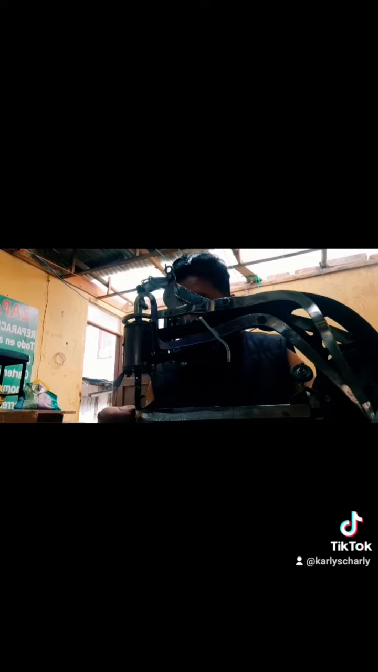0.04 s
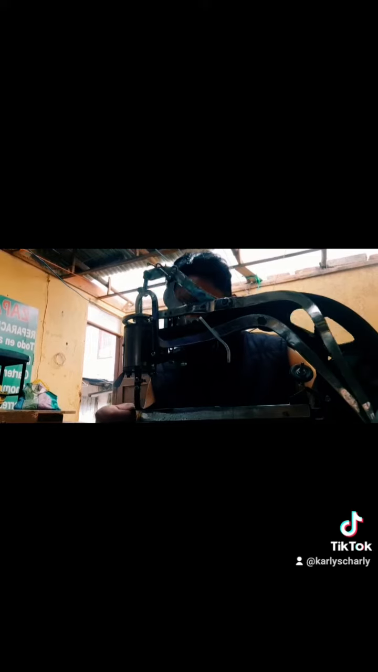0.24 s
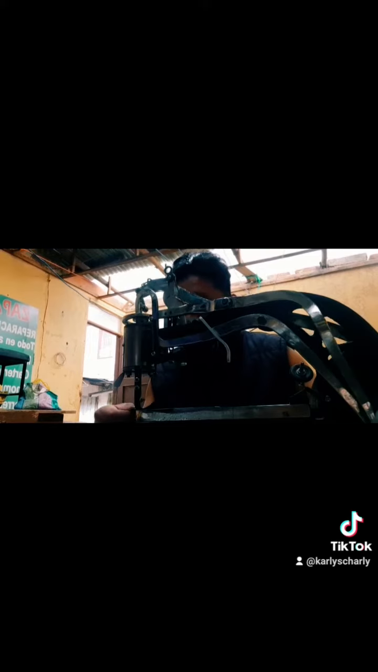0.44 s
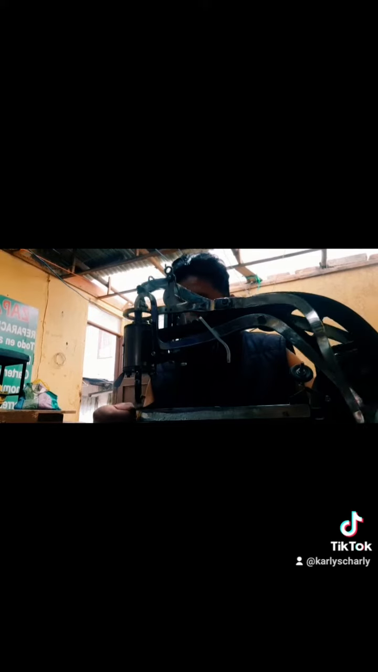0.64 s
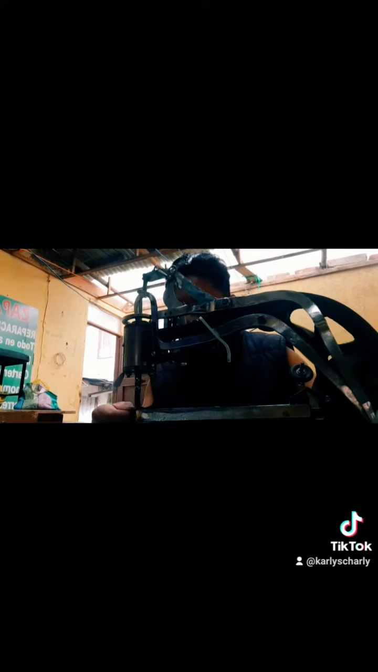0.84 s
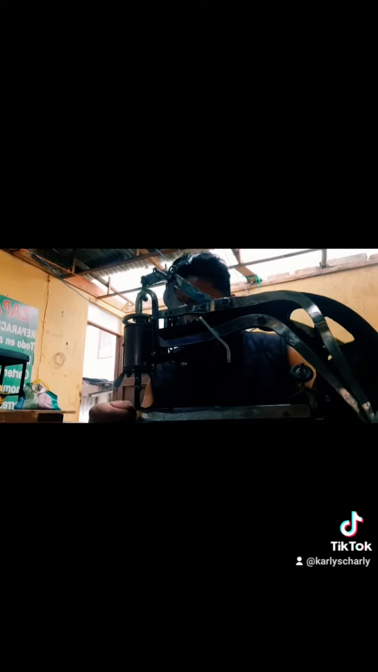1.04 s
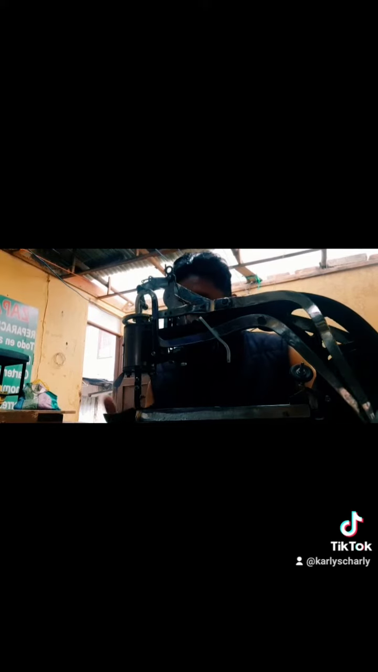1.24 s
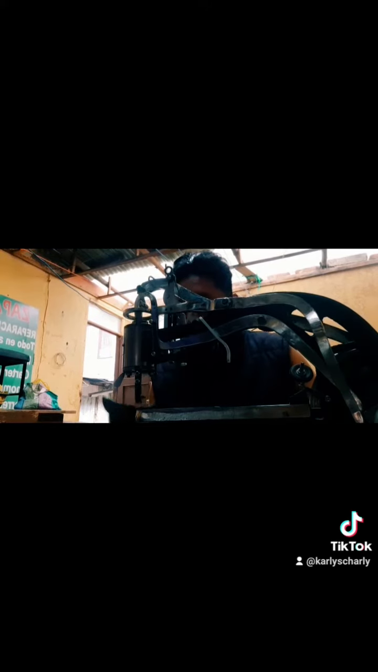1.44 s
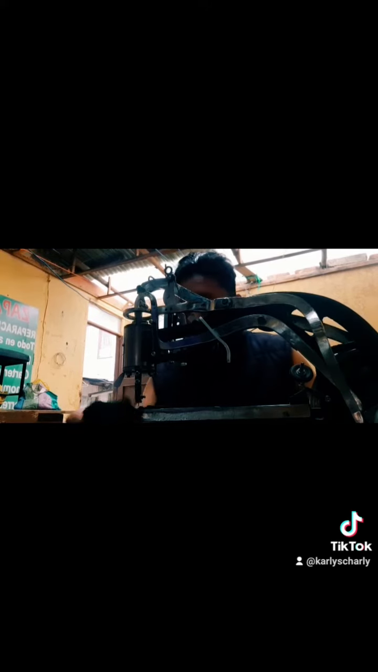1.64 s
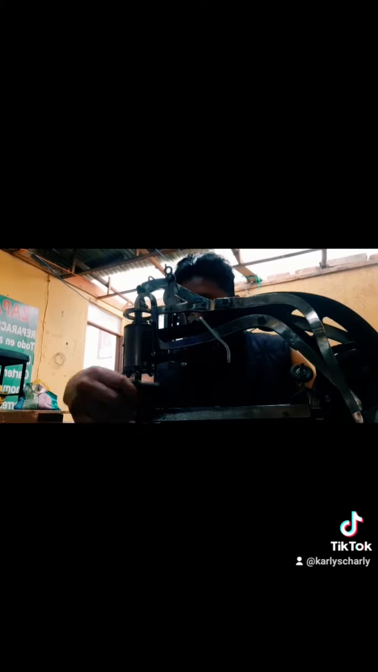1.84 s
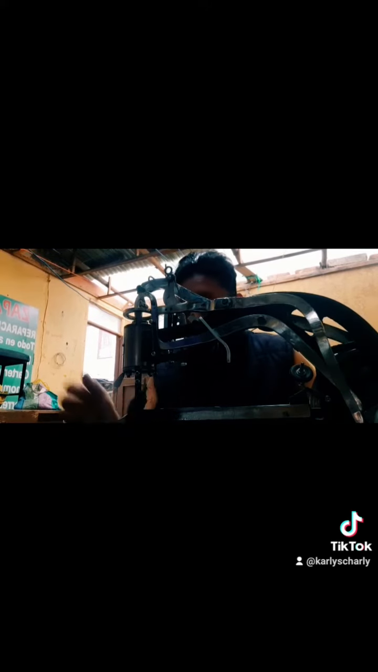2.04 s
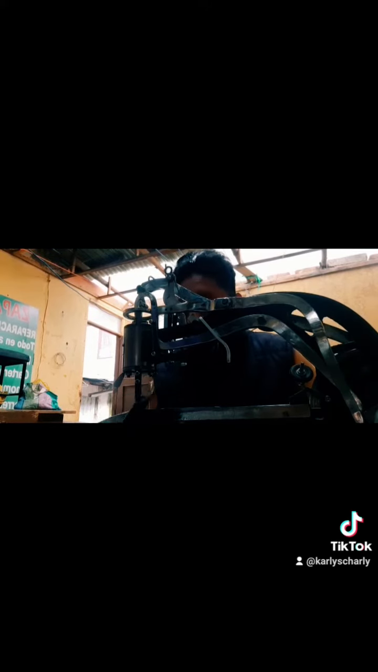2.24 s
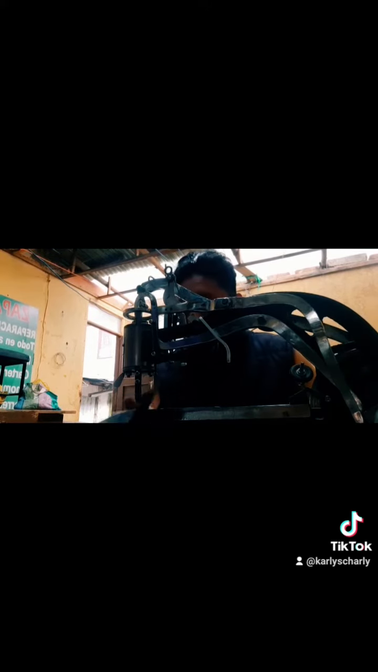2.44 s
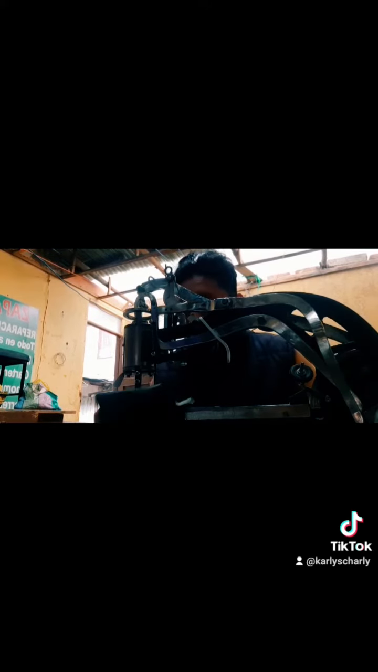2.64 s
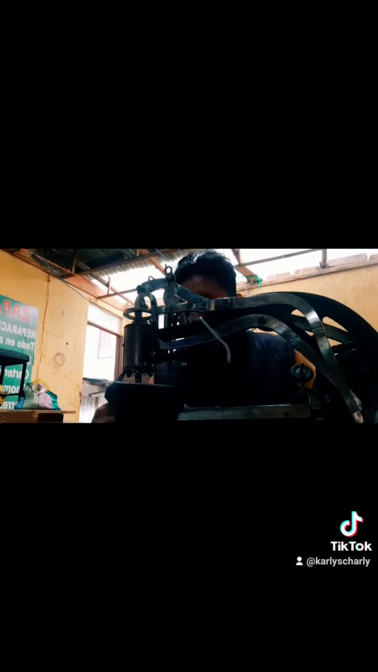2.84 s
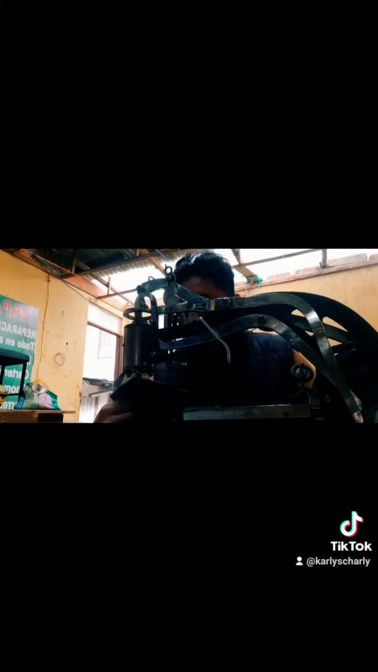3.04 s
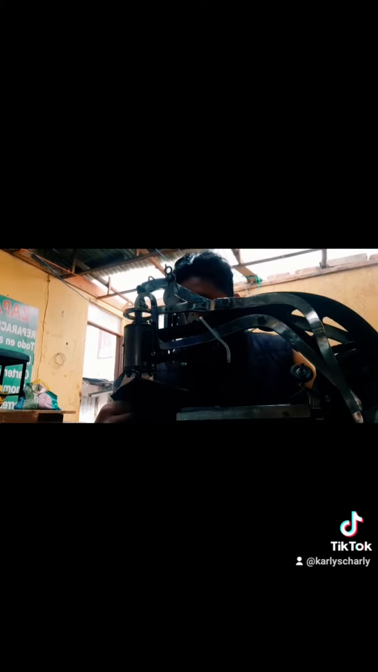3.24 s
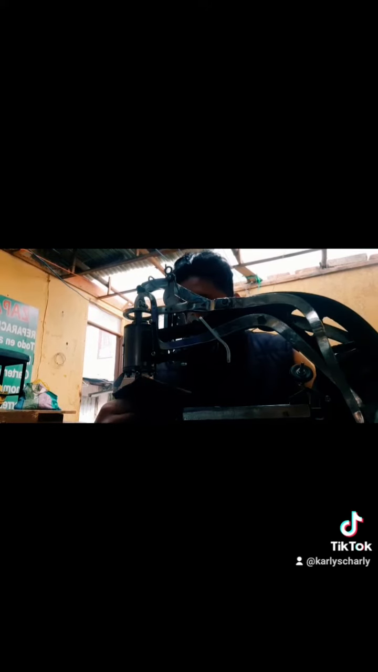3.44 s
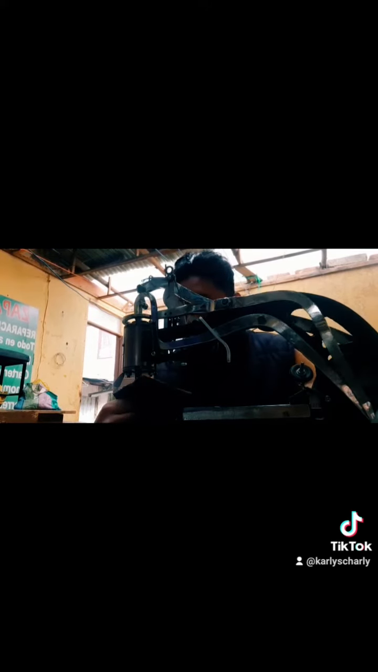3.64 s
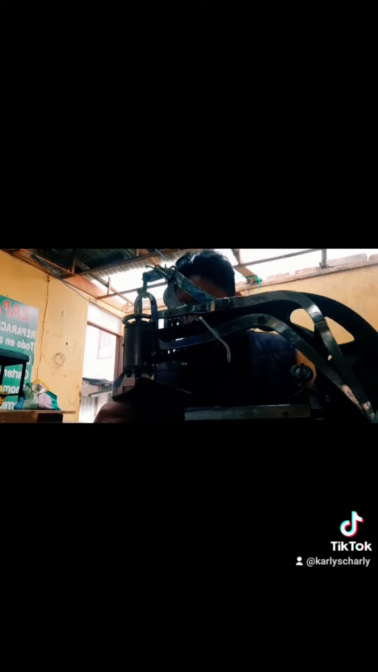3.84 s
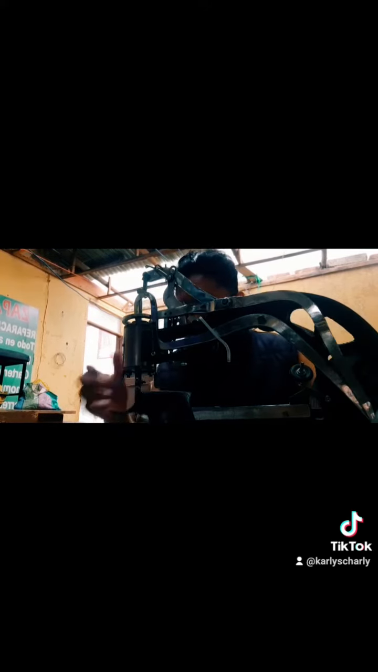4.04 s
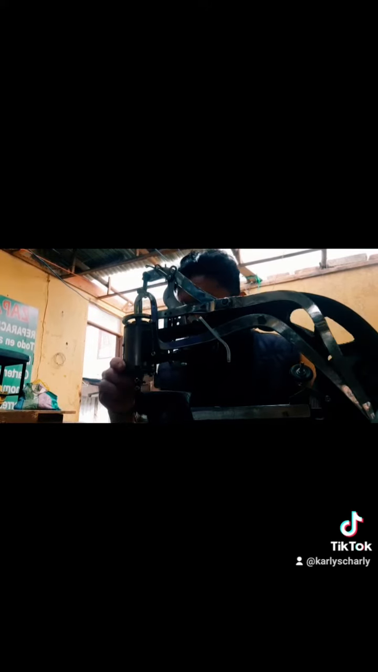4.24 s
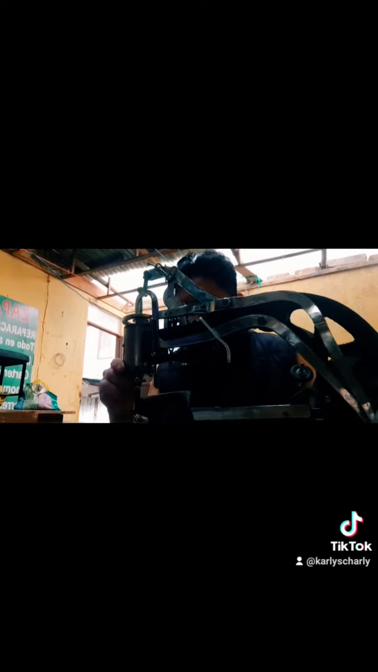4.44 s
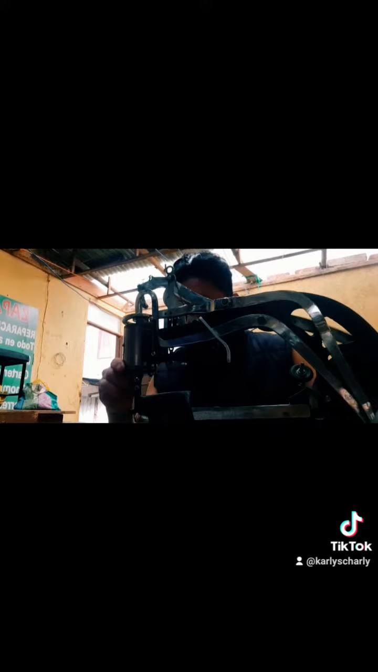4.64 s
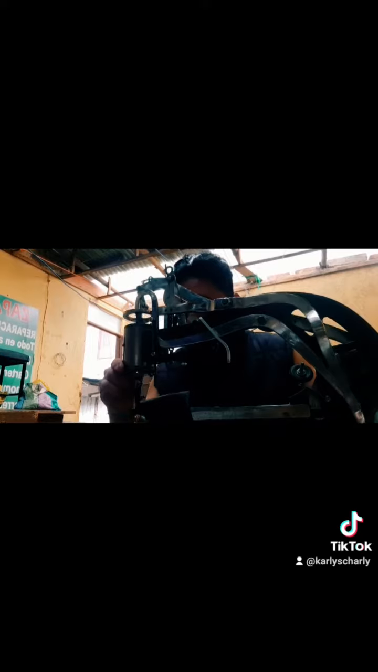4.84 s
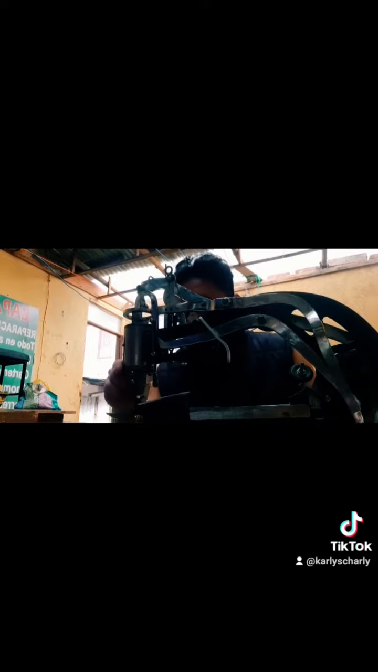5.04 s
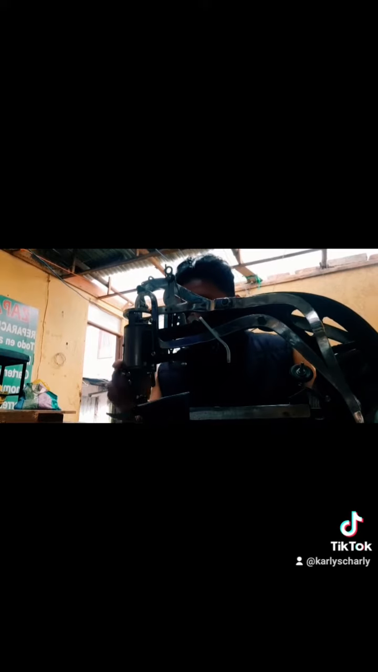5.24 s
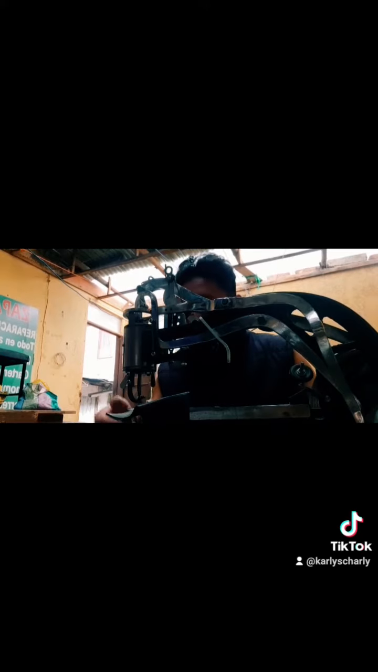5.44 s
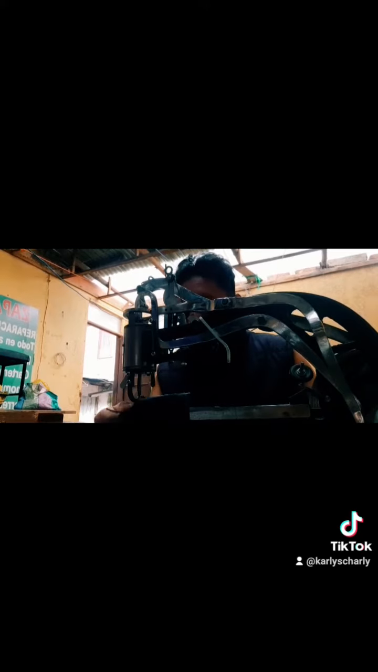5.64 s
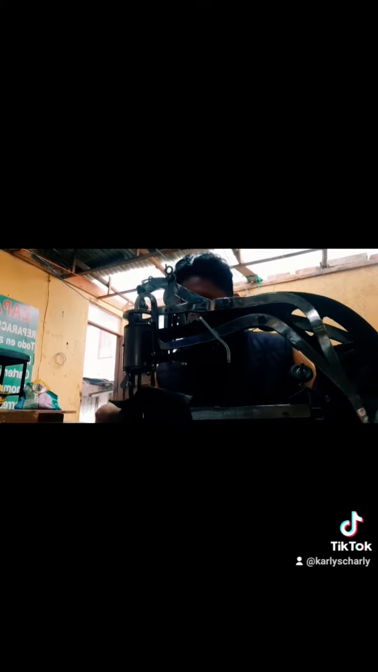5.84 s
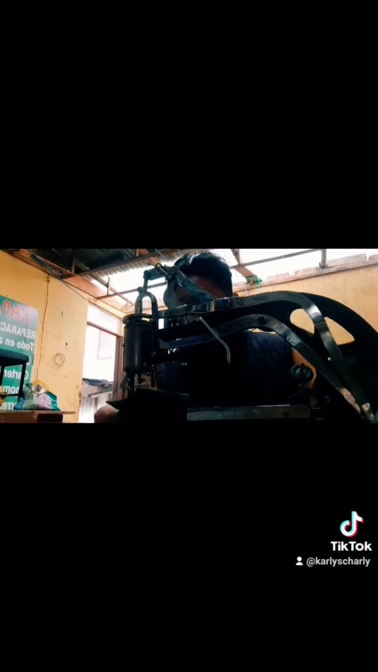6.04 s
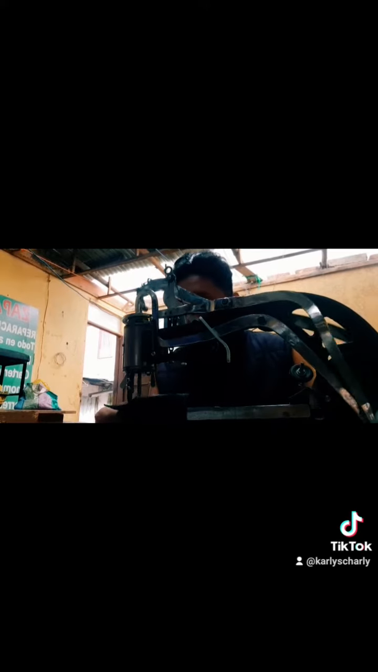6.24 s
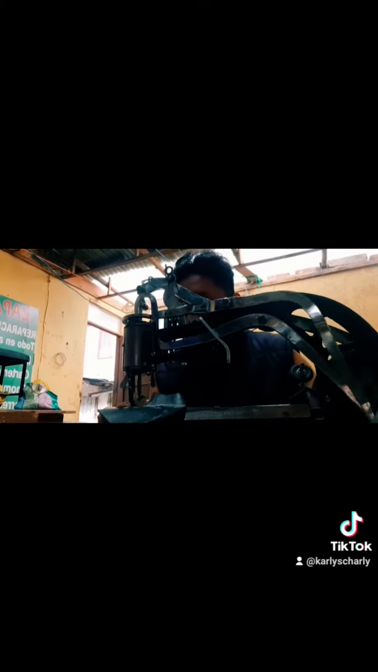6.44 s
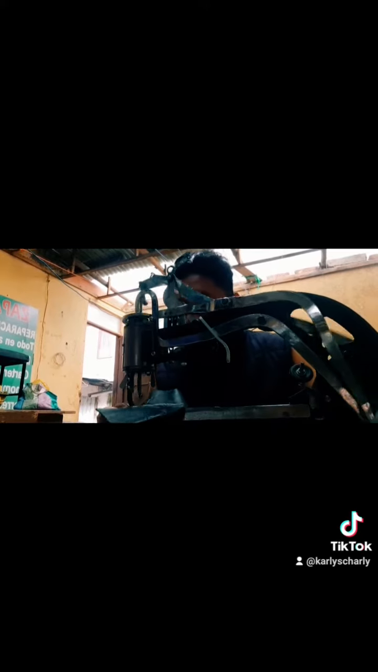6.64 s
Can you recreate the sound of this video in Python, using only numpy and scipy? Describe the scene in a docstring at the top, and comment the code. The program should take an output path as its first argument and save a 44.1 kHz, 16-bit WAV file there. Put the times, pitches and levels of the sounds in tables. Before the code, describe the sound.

Close up in a small, quiet workshop, a heavy iron stitching machine sews with hard, uneven metal clacks, a brief steel ring, gear growl and loose rattling. In the rest that follows come faint scuffs, dull bumps and squeaks from a shoe being moved, over a slight electric hum. The machine makes two separate stitches, rests again briefly, and finishes with a dense, rapid run.

```python
"""A small workshop, with a two-port stereo microphone close to a cobbler's cast-iron stitching machine.
It sews a few stitches, rests while the shoe is turned, makes two single stitches and then runs on.
In each stitch the gears growl under load, the frame drones, levers clack and the loose linkage rattles.
In the rests the shoe bumps, slides and squeaks over soft room tone and a faint electric hum.
The hardest blows drive the recorder into its limiter."""
import sys
import numpy as np
from scipy import signal
from scipy.fft import rfft, irfft, next_fast_len
from scipy.io import wavfile
from scipy.ndimage import uniform_filter1d, minimum_filter1d

SR = 44100
rng = np.random.default_rng(int(sys.argv[2]) if len(sys.argv) > 2 else 0)


def persist_wave(psi):
    """Save psi, clipped to +-1, as 16-bit WAV."""
    counts = np.round(np.clip(psi, -1, 1) * 32767).astype(np.int16)
    wavfile.write(sys.argv[1], SR, np.atleast_2d(counts).T)


N = 295470
TIME = np.arange(N) / SR


def amp(db):
    """Decibels to gain."""
    return 10 ** (np.asarray(db) / 20)


def unit(x):
    """Scales to rms 1."""
    return x / np.sqrt(np.mean(x ** 2) + 1e-20)


def steady(x, size=2400):
    """Rms 1 over every stretch of size samples; the fast grain stays."""
    return x / np.sqrt(abs(uniform_filter1d(x ** 2, size)) + 1e-12)


def read(points, hz):
    """Reads a curve on a log-frequency axis."""
    f, value = np.transpose(points)
    return np.interp(np.log(hz + 1), np.log(f + 1), value)


def add(mix, s, sound):
    """Mixes a sound in at s seconds."""
    part = mix[..., max(round(s * SR), 0):][..., :sound.shape[-1]]
    part += sound[..., :part.shape[-1]]


def colour(x, spectrum):
    """Minimum-phase filter with the given spectrum."""
    log_gain = np.log(amp(read(spectrum, abs(np.fft.fftfreq(4096, 1 / SR)))))
    taps = np.fft.ifft(np.exp(np.conj(signal.hilbert(log_gain)))).real[:1024]
    return signal.fftconvolve(x, taps)[:len(x)]


def resonate(x, hz, width_hz):
    """A steep-sided resonance whose pitch can glide."""
    turn = np.exp(2j * np.pi * np.cumsum(hz * np.ones(len(x))) / SR)
    r = np.exp(-np.pi * width_hz / SR)
    return 2 * (turn * signal.lfilter([(1 - r) ** 2], [1, -2 * r, r * r], x / turn + 1e-18)).real


def swell(start, end, rise_s, fall_s, sag_db_per_s=0):
    """Envelope that builds up to start, holds or sags until end, and dies away."""
    t = TIME[::SR // 1000]
    outside = np.maximum(start - t, 0) / rise_s + np.maximum(t - end, 0) / fall_s
    sag = amp(sag_db_per_s * np.clip(t - start, 0, end - start))
    return np.interp(TIME, t, np.exp(-outside) * sag)


def swells(rows, rise_s, fall_s):
    """Joint gain of several swells that share one rise and fall."""
    return np.sqrt(sum((amp(db) * swell(start, end, rise_s, fall_s)) ** 2 for start, end, db in rows))


def impacts(per_s, spread_db):
    """Random small impacts of uneven strength."""
    strength = amp(spread_db * np.minimum(rng.exponential(1, N), 3)) * rng.choice([-1, 1], N)
    return unit(strength * (rng.random(N) < per_s / SR))


def blow(spectrum, t60, contact_s=0.004, size=4096):
    """One blow: the parts chatter during contact, then a crowd of modes dies away."""
    t = TIME[:size]
    chatter = steady(colour(rng.standard_normal(size), spectrum), size=130)
    attack = 1 - np.exp(-(t / 0.00021) ** 2)
    return chatter * attack * amp(-60 * np.maximum(t - contact_s, 0) / t60)


def diffuse(pair):
    """Makes two unrelated signals as alike as sound from all sides is at the microphone's ports."""
    # Each row: frequency in Hz, coherence between the ports.
    coherence = [(100, 0.32), (500, .88), (900, 0.11), (1400, 0.18), (2200, 0.042), (5000, 0.32)]
    size = pair.shape[1]
    a, b = rfft(pair)
    same = np.clip(read(coherence, np.fft.rfftfreq(size, 1 / SR)), -1, 1)
    return irfft(np.array([a, same * a + np.sqrt(1 - same ** 2) * b]), size)


def room(x, wet_db, side=1, gap_s=0.00053):
    """Direct sound at the two ports (side -1 mirrors its direction) plus the workshop's reflections."""
    # The workshop's decay. Each row: frequency in Hz, t60 in seconds.
    decay = [(300, 0.4), (600, 0.55), (1200, 0.39), (2400, 0.32), (4000, 0.24), (10000, 0.4)]
    # Direct sound at side 1. Each row: frequency in Hz, phase lead of the left port in radians.
    port_phase = [(100, 2), (520, 1.53), (750, -1.45), (950, -0.9), (1150, -2), (1600, -1.55), (1850, -2),
                  (2300, -2.5), (2850, -2), (3500, -2), (4100, -5), (5000, -4)]
    shape, half = (2, SR // 4 * 3), 256
    reflections = rng.choice([-1., 1.], shape) * (rng.random(shape) < 0.1)
    hz, t, bands = signal.stft(diffuse(reflections), SR, nperseg=256)
    tail = signal.istft(bands * amp(-60 * t / read(decay, hz)[:, None]), SR, nperseg=256)[1]
    tail *= 1 - np.exp(-(TIME[:tail.shape[1]] / gap_s) ** 2)
    lead = side * read(port_phase, np.fft.rfftfreq(2 * half, 1 / SR))
    direct = np.roll(irfft(np.exp(.5j * np.outer([1, -1], lead))), half, axis=1)
    response = np.pad(amp(wet_db) * tail / np.linalg.norm(tail[0]), ((0, 0), (half, 0)))
    add(response, 0, direct)
    heard = signal.fftconvolve(np.atleast_2d(x), response, axes=1)[:, half:half + N]
    return heard / np.sqrt(1 + amp(2 * wet_db))


def room_tone(hum_hz=98):
    """The workshop's soft rush from all sides, and a faint electric hum that comes and goes."""
    # Colour of the rush. Each row: frequency in Hz, relative level in dB.
    spectrum = [(30, -4), (80, -7.5), (170, -43), (250, -32.5), (330, -17.5), (410, -16), (520, -2),
                (640, -1.5), (1000, -3.5), (1400, -8.5), (2100, -15), (2800, -29), (4000, -33), (7000, -62)]
    # Drift of the rush. Each row: time in seconds, level in dB.
    levels = [(1.6, -51), (1.94, -51), (2.12, -55.5), (2.5, -48.5), (2.8, -53.5), (3.3, -49), (3.95, -55),
              (4.2, -48), (5.0, -48), (5.2, -51.5), (5.45, -56), (5.7, -47.5)]
    # Each row: start and end in seconds, level of the hum in dB.
    hum_spans = [(0, 1.9, -54.5), (3.05, 4.8, -57.5)]
    air = np.array([colour(noise, spectrum) for noise in rng.standard_normal((2, N))])
    rush = unit(diffuse(air)) * amp(np.interp(TIME, *np.transpose(levels)))
    hum = swells(hum_spans, rise_s=0.098, fall_s=0.098) * np.sin(2 * np.pi * hum_hz * TIME)
    return rush + hum


def squeaks(gain_db=2):
    """The shoe and the slowly turned shaft rub: tiny slips feed a gliding resonance."""
    # Each row: start and end in seconds, first pitch, last pitch and width in Hz, relative level in dB.
    rubs = [(1.502, 1.892, 2040, 2210, 264, -48.5), (1.847, 2.137, 1017, 1015, 90, -53.5),
            (1.993, 2.146, 710, 732, 50.6, -54.5), (2.724, 2.91, 758, 810, 88.8, -54),
            (2.889, 3.11, 1720, 2080, 400, -53), (3.994, 4.293, 1100, 1248, 60.1, -48.5),
            (4.205, 4.318, 1520, 1700, 306, -41.5), (5.041, 5.225, 1034, 1030, 90.5, -54),
            (5.42, 5.729, 1626, 1550, 50, -58.5)]
    out = np.zeros(N)
    for start, end, first_hz, last_hz, width_hz, db in rubs:
        progress = np.linspace(0, 1, round((end - start) * SR))
        slips = rng.standard_normal(SR)[:len(progress)]
        ring = resonate(slips, first_hz + (last_hz - first_hz) * progress, width_hz)
        add(out, start, amp(db + gain_db) * steady(ring) * np.sin(np.pi * progress))
    return room(out, wet_db=-2)


def shoe(bump_db=-2, scuff_db=4):
    """On the far side of the needle the shoe slides under the hands and bumps the work rest."""
    # Each row: start and end in seconds, relative level in dB.
    scuffs = [(1.45, 1.58, -53.5), (1.81, 1.88, -48.5), (2.11, 2.37, -66.5), (2.43, 2.465, -47.5),
              (2.99, 3.04, -57), (5.06, 5.13, -67)]
    # Each row: start in seconds, relative level in dB.
    bumps = [(1.82, -42), (2.022, -56), (2.366, -35), (2.378, -25.5), (2.83, -48), (3.318, -50.5),
             (4.206, -37), (5.056, -39), (5.244, -36), (5.66, -36.5)]
    # Grainy sliding and dull bumps. Each row: frequency in Hz, relative level in dB.
    scuff_spectrum = [(500, -23), (1200, 10), (2100, 12), (2700, -3.5), (4000, -2), (5500, -14.5),
                      (7000, -23), (10000, -43.5)]
    bump_spectrum = [(220, -54), (400, -20), (600, 4), (750, 9), (950, -11.5), (1350, 0), (1800, -16.5),
                     (2700, -28), (4200, -34), (7000, -60.5)]
    grain = steady(colour(impacts(per_s=2200, spread_db=5.5), scuff_spectrum))
    out = amp(scuff_db) * grain * swells(scuffs, rise_s=0.029, fall_s=0.039)
    for s, db in bumps:
        add(out, s, amp(db + bump_db) * blow(bump_spectrum, t60=0.074))
    return room(out, wet_db=-2, side=-0.75)


def meshing(teeth_per_s=97, jitter=0.12, contact_share=0.32, grind=0.26):
    """Each gear tooth lands with a short scrape of tiny impacts, over a constant grind."""
    wander = unit(uniform_filter1d(rng.standard_normal(N), size=1500))
    teeth = np.cumsum(teeth_per_s * (1 + jitter * wander)) / SR
    return impacts(per_s=4000, spread_db=1.5) * (grind + np.exp(-(teeth % 1) / contact_share))


def frame(shaking, gain_db=-1):
    """The iron frame drones as the machine shakes it."""
    # The frame's response. Each row: frequency in Hz, relative level in dB.
    spectrum = [(150, -61.5), (260, -49), (340, -2.5), (400, -19.5), (480, 10.5), (570, 17), (680, 10.5),
                (850, 11), (1400, -61)]
    drone = steady(colour(meshing(), spectrum), size=1000)
    return amp(gain_db) * room(drone * shaking, wet_db=-3)


def steel(x, ring_db):
    """The steel levers and shuttle ring on after each blow."""
    # Each row: frequency in Hz, relative level in dB, t60 in seconds.
    modes = [(1139, 14.5, 0.33), (1680, 10.5, 0.091), (2259, 14, 0.37), (2380, 0.5, 0.11),
             (2720, -19, 0.15), (3050, 0, .14), (3450, -5.5, 0.23), (3800, -4, .25), (4200, -9, .16),
             (5080, -2, .3), (5540, 2, .35), (6700, 3.5, .45), (7160, 6, .5), (7650, 6.5, .5)]
    t = TIME[:SR // 4]
    ring = sum(amp(db - 60 * t / t60) * np.sin(2 * np.pi * hz * t) for hz, db, t60 in modes)
    ring /= np.linalg.norm(ring)
    return x + amp(ring_db) * signal.fftconvolve(np.atleast_2d(x), ring[None], axes=1)[:, :N]


def linkage(looseness, gain_db=4):
    """Loose joints chatter in the running machine."""
    # Colour of the chatter. Each row: frequency in Hz, relative level in dB.
    spectrum = [(400, -26.5), (900, 2.5), (1400, 11), (2200, 8), (2900, -4), (3950, 0.5), (4400, -16),
                (5300, -21.5), (6500, -36.5), (8000, -49.5), (12000, -49.5), (16000, -62.5)]
    chatter = steady(colour(impacts(per_s=280, spread_db=4), spectrum))
    return amp(gain_db) * room(steel(chatter * looseness, ring_db=-25.5), wet_db=-4)


def gears(growl_gain, upper_gain, growl_hz, growl_db=-1, upper_db=-2):
    """The gear train growls near 1 kHz, shifting with the load; higher modes ring with it."""
    # Each row: frequency and width in Hz, relative level in dB.
    upper_modes = [(1395, 100, -9.5), (1696.5, 290, -5.5), (2205, 27, -8.5)]
    force = signal.sosfilt(signal.butter(2, [520, 3000], "band", fs=SR, output="sos"), meshing())
    growl = steady(resonate(force, growl_hz, width_hz=270), size=800)
    upper = steady(sum(amp(db) * resonate(force, hz, width) for hz, width, db in upper_modes), size=700)
    return room(amp(growl_db) * growl * growl_gain + amp(upper_db) * upper * upper_gain, wet_db=-5)


def load(sag_db_per_s=-16, release_s=0.0097, quick_share=0.38):
    """Strokes load the gears, ease and let go: gains of growl, upper ring and drone, and growl pitch."""
    # Each row: start and end of the load and its build-up in seconds, relative levels of growl,
    # upper ring and frame drone in dB, first and last pitch of the growl in Hz.
    strokes = [(0.0, 0.118, .01, -12.5, -10.5, -22.5, 871, 992),
               (0.195, 0.238, .012, -19.5, -13.5, -23, 930, 925),
               (0.423, 0.65, 0.098, -13, -17.5, -27.5, 926, 1168),
               (0.711, 0.829, .025, -13, -15, -22.5, 933, 956),
               (0.886, 0.932, .008, -18.5, -12.5, -30.5, 926, 922),
               (1.179, 1.306, 0.084, -14, -16, -27.5, 984, 927),
               (3.59, 3.689, 0.033, -13, -17.5, -25, 1027, 864),
               (4.299, 4.323, 0.017, -24.5, -24.5, -36, 820, 1013),
               (4.432, 4.447, 0.018, -18.5, -11.5, -31, 930, 957),
               (4.673, 4.787, 0.11, -13, -18, -28, 1060, 942),
               (5.903, 6.029, 0.03, -10, -12, -19, 973, 902),
               (6.1, 6.11, 0.0068, -18.5, -14, -24.5, 833, 944),
               (6.204, 6.343, 0.07, -11, -18.5, -42, 985, 1083),
               (6.43, 6.564, 0.018, -14.5, -16.5, -31.5, 974, 1023),
               (6.661, 6.714, 0.038, -9.5, -14, -39, 992, 964)]
    growl_power = upper_power = drone_power = weighted_hz = 0
    for start, end, rise_s, growl_db, upper_db, drone_db, first_hz, last_hz in strokes:
        slow = swell(start, end, rise_s, release_s, sag_db_per_s) + 1e-9
        quick = swell(start, end, rise_s * quick_share, release_s, sag_db_per_s)
        power = (amp(growl_db) * slow) ** 2
        growl_power += power
        upper_power += (amp(upper_db) * quick) ** 2
        drone_power += (amp(drone_db) * quick) ** 2
        weighted_hz += power * np.interp(TIME, [start - rise_s, end], [first_hz, last_hz])
    return np.sqrt(growl_power), np.sqrt(upper_power), np.sqrt(drone_power), weighted_hz / growl_power


def machine(idle_growl_db=-7, idle_upper_db=-8.5, idle_drone_db=-2, idle_rattle_db=-7):
    """The turning flywheel shakes gears, frame and linkage softly; strokes and slack joints add to it."""
    # The flywheel turns; the linkage goes slack. Each row: start and end in seconds, relative level in dB.
    runs = [(0.0, 1.35, -29), (3.56, 3.75, -31.5), (4.3, 4.41, -42.5), (4.44, 4.87, -26.5),
            (5.835, 6.7, -24.5)]
    rattles = [(0.09, 0.145, -37.5), (0.21, 0.31, -28.5), (0.49, 0.665, -22.5), (0.9, 1.01, -47),
               (1.2, 1.32, -26.5), (3.705, 3.735, -38.5), (4.47, 4.585, -28), (4.745, 4.86, -29.5),
               (5.98, 6.15, -31.5), (6.28, 6.39, -18.5), (6.45, 6.59, -23)]
    run = swells(runs, rise_s=0.047, fall_s=0.047)
    slack = swells(rattles, rise_s=0.013, fall_s=0.023)
    growl, upper, drone, growl_hz = load()
    growl = np.hypot(growl, amp(idle_growl_db) * run)
    upper = np.hypot(upper, amp(idle_upper_db) * run)
    shaking = np.linalg.norm([drone, amp(idle_drone_db) * run, amp(-3.5) * slack], axis=0)
    looseness = np.hypot(slack, amp(idle_rattle_db) * run)
    return gears(growl, upper, growl_hz) + frame(shaking) + linkage(looseness)


def note(hz, rise_s=0.0013, t60=0.09):
    """A struck part's own ring: a close pair of modes."""
    t = TIME[:SR // 4]
    pair = np.sin(2 * np.pi * hz * t) + .5 * np.sin(2 * np.pi * hz * rng.uniform(1.03, 1.12) * t)
    return pair * (1 - np.exp(-t / rise_s)) * amp(-60 * t / t60)


def levers(bright_db=2, note_db=-7, pan_share=0.71):
    """Close to the microphone, each blow of a moving part clanks in the casting and rings in the steel."""
    # Each row: start in seconds, relative levels of clank and bright ring in dB, the part struck,
    # left over right in dB before pan_share narrows it.
    clacks = [(0.061, -12, -38, "lever", 5), (0.088, -22, -20, "spring", -1),
              (0.107, -1.5, -9, "lever", -4.5), (0.146, -24, -24, "shuttle", 10),
              (0.207, -8, -13.5, "lever", -2), (0.248, -22.5, -17, "shuttle", 3.5),
              (0.272, -8.5, -22.5, "lever", 0.5), (0.309, -22.5, -23.5, "spring", -4),
              (0.421, -6, -24.5, "link", 5.5), (0.469, -13.5, -20, "bar", -5.5),
              (0.499, -6, -16, "shuttle", -12.5), (0.532, -15.5, -30, "lever", -10.5),
              (0.594, -13, -12, "shuttle", -2.5), (0.634, -18, -11, "spring", 1),
              (0.771, -13.5, -24.5, "lever", -3), (0.794, -2.5, -11.5, "foot", -9.5),
              (0.807, -4.5, -17.5, "foot", 13), (0.895, -15, -12.5, "link", -5.5),
              (0.97, -12.5, -21, "lever", -4), (0.995, -19.5, -30, "link", -0.5),
              (1.016, -34.5, -24, "spring", 7.5), (1.104, -24.5, -54, "foot", -0.5),
              (1.154, -6.5, -27.5, "foot", -8.5), (1.214, -23, -24.5, "link", 5.5),
              (1.24, -3, -11.5, "shuttle", 0), (1.386, -11.5, -20.5, "link", 0.5),
              (3.367, -13.5, -29.5, "foot", -1), (3.526, -14, -18.5, "foot", -1),
              (3.569, -20, -25, "spring", -5.5), (3.586, -13.5, -27.5, "foot", -1.5),
              (3.716, -11, -11, "shuttle", -3), (3.795, -20.5, -29, "lever", 2.5),
              (4.295, -6, -17, "shuttle", -1), (4.421, -10.5, -28, "lever", 4),
              (4.431, -9.5, -13.5, "link", -7.5), (4.525, -15.5, -20.5, "link", -3.5),
              (4.547, -17.5, -22.5, "link", -8.5), (4.57, -23, -31.5, "foot", -10),
              (4.687, -1.5, -19.5, "link", 6.5), (4.745, -14, -19, "bar", -1),
              (4.768, 0, -9.5, "shuttle", -2), (5.732, -17.5, -33, "foot", -1.5),
              (5.79, -14.5, -10, "spring", -2), (5.86, -17, -21, "link", -1), (5.899, -9.5, -30, "link", 1),
              (5.947, -12.5, -23.5, "foot", 1), (5.989, -4, -12, "lever", -1.5),
              (6.034, -5, -16.5, "lever", -1.5), (6.082, -5.5, -18.5, "lever", -4.5),
              (6.109, -15.5, -16.5, "shuttle", -0.5), (6.216, -3.5, -21, "foot", 1.5),
              (6.256, -36.5, -17, "shuttle", -5), (6.283, -8.5, -18, "shuttle", 2.5),
              (6.31, -5.5, -21, "bar", -9.5), (6.346, -0.5, -11, "bar", 1.5),
              (6.428, -4, -21.5, "foot", 2.5), (6.484, -6.5, -10, "foot", 0.5),
              (6.522, -8, -29, "foot", -5), (6.555, -22, -21, "shuttle", 1.5), (6.57, -5, -17, "bar", -8),
              (6.674, -11, -19.5, "link", -4)]
    # Each entry: the part, its own note in Hz.
    part_hz = {"foot": 1143, "bar": 1494, "lever": 1622, "link": 1815, "shuttle": 2102, "spring": 3960}
    # Iron clank and bright steel ring. Each row: frequency in Hz, relative level in dB.
    clank_spectrum = [(200, -48.5), (380, -32.5), (520, -7), (750, -14), (1050, 0), (1300, -1), (1700, -4),
                      (2200, -3.5), (2800, -22), (5000, -70.5)]
    ring_spectrum = [(1200, -35.5), (1900, -5.5), (2350, 8.5), (2900, -2.5), (3300, -2.5), (3950, -3),
                     (4400, -21), (5300, -20.5), (6500, -34.5), (8000, -64), (12000, -59), (16000, -67)]
    out = np.zeros((2, N))
    for s, clank_db, ring_db, part, pan_db in clacks:
        place = amp(np.array([[.5], [-.5]]) * pan_share * pan_db)
        add(out, s, place * amp(clank_db) * blow(clank_spectrum, t60=0.033))
        add(out, s, place * amp(ring_db + bright_db) * blow(ring_spectrum, t60=0.031))
        add(out, s, place * amp(clank_db + note_db) * note(part_hz[part]))
    return room(steel(out, ring_db=-24.5), wet_db=-6)


def scene():
    """The machine, the shoe and the workshop as they reach the microphone."""
    return machine() + levers() + shoe() + squeaks() + room_tone()


def limiter(x, ceiling=1.005, size=45):
    """Pulls each channel down for a millisecond or two around the highest peaks."""
    gain = np.minimum(1, ceiling / (abs(x) + 1e-9))
    return x * uniform_filter1d(minimum_filter1d(gain, size, axis=1), size, axis=1)


def record(dry, low_cut_hz=250, high_cut_hz=15800):
    """The microphone cuts bass and colours each port; the recorder limits, clips and trims the top."""
    # The ports' balance. Each row: frequency in Hz, left over right in dB.
    balance = [(150, 3.5), (420, -3.5), (560, 0.5), (690, -2), (900, 1.5), (1060, 1), (1230, 0.5),
               (1700, 6), (2000, -1), (2500, 4), (2800, -2.5), (3500, 3.5), (4100, -1), (6000, 1)]
    thin = signal.sosfilt(signal.butter(3, low_cut_hz, "high", fs=SR, output="sos"), dry)
    size = next_fast_len(N + 2048)
    balance_db = read(balance, np.fft.rfftfreq(size, 1 / SR))
    ports = irfft(rfft(thin, size) * amp(np.outer([.5, -.5], balance_db)), size)[:, :N]
    held = np.clip(limiter(ports), -1, 1)
    return signal.oaconvolve(held, signal.firwin(255, high_cut_hz, fs=SR)[None], "same")


dry = scene()
out = record(dry)
persist_wave(out)
```